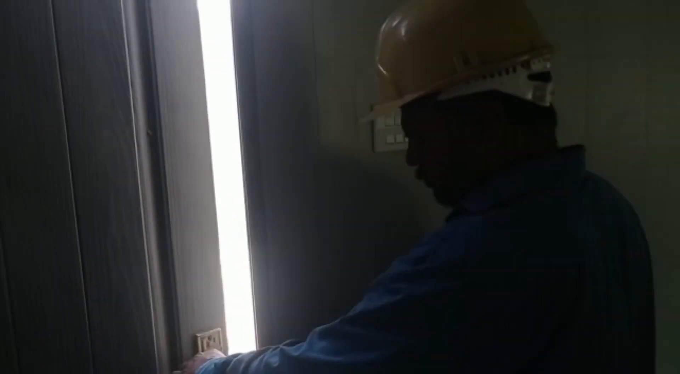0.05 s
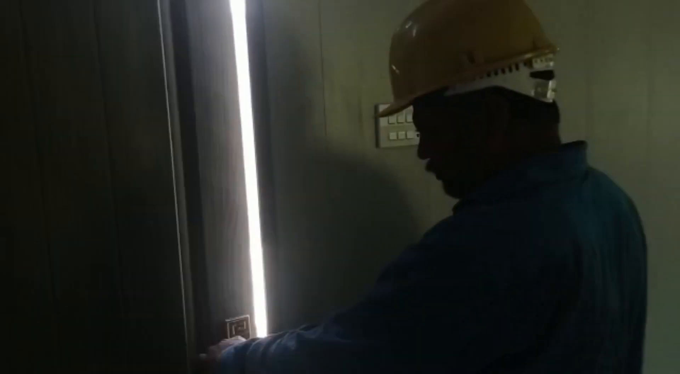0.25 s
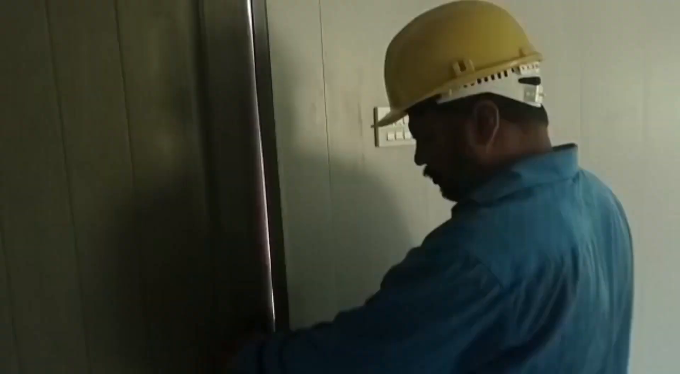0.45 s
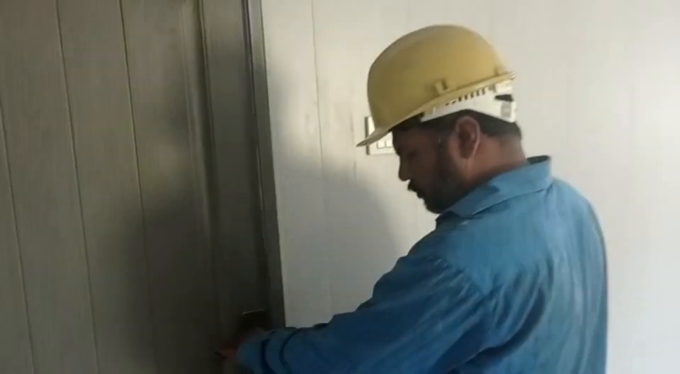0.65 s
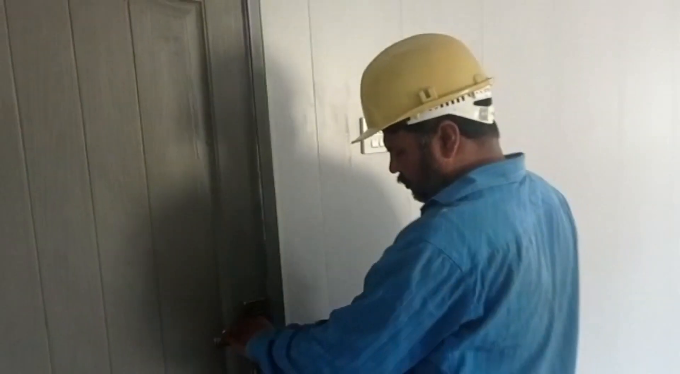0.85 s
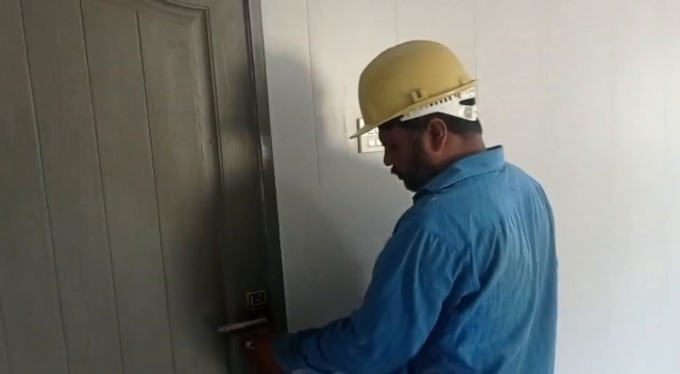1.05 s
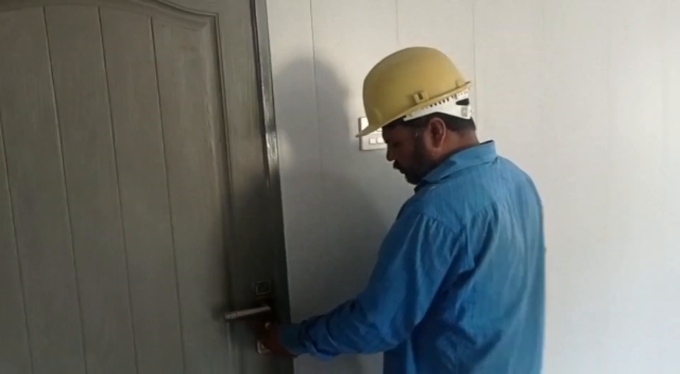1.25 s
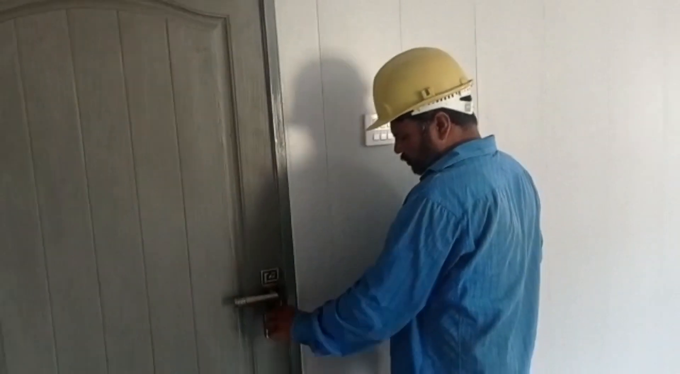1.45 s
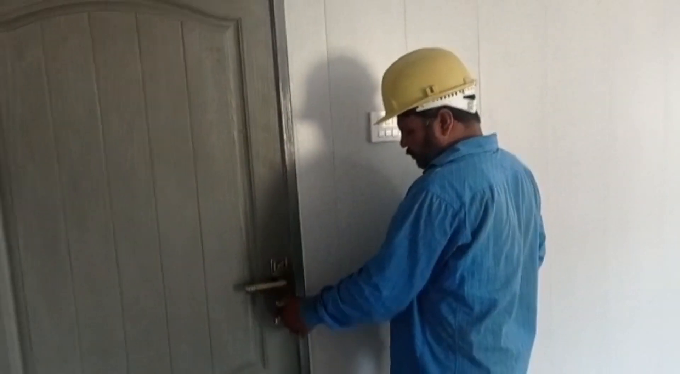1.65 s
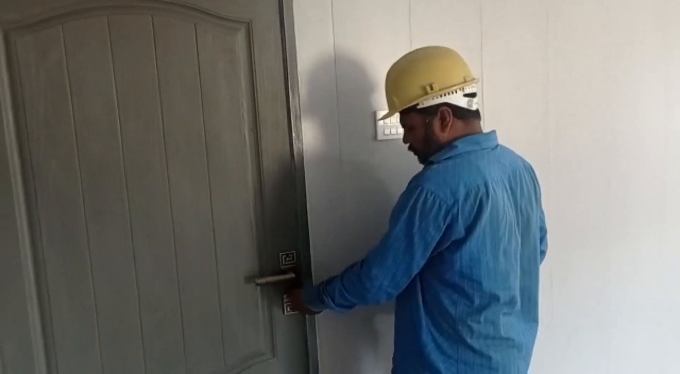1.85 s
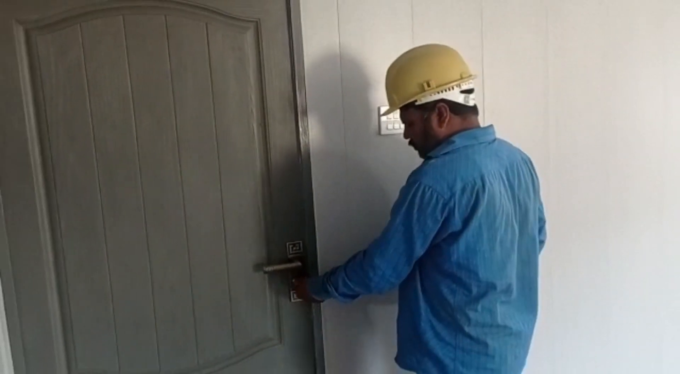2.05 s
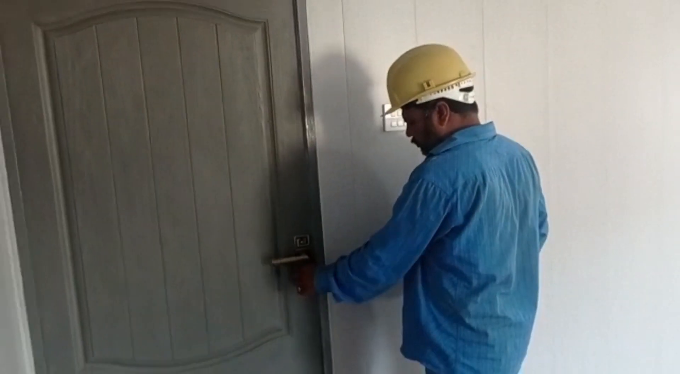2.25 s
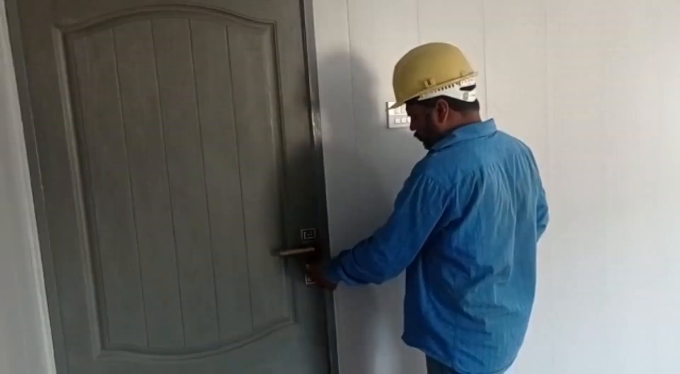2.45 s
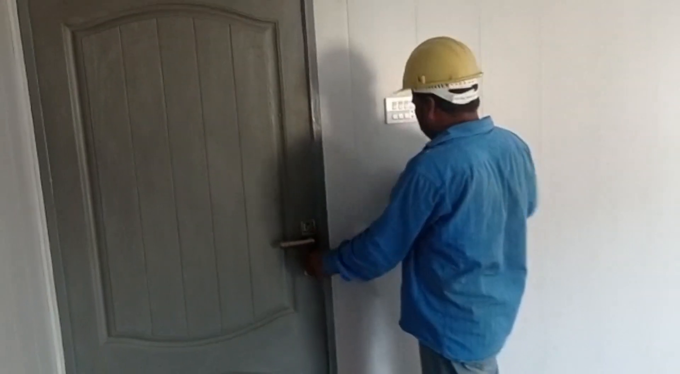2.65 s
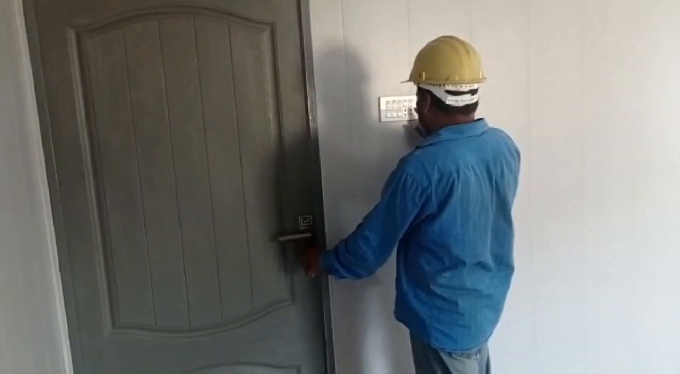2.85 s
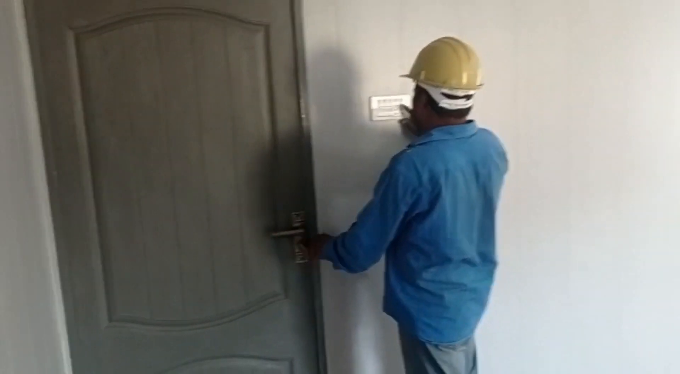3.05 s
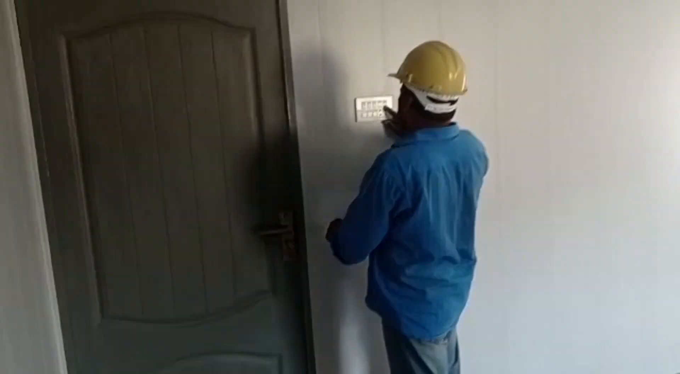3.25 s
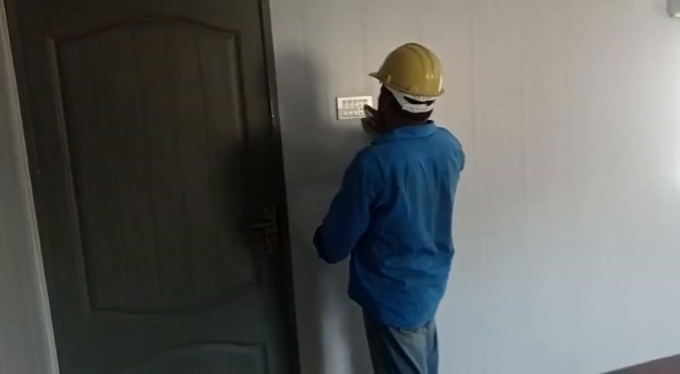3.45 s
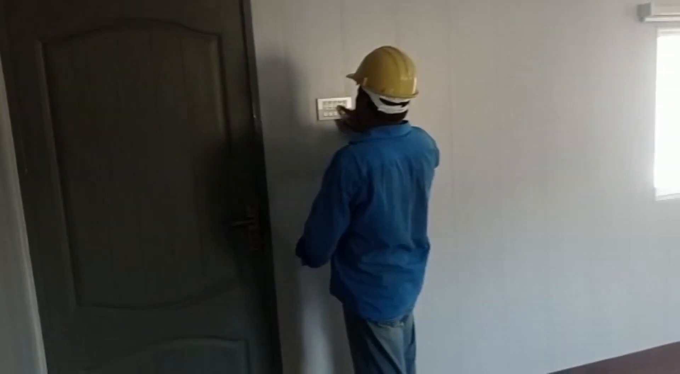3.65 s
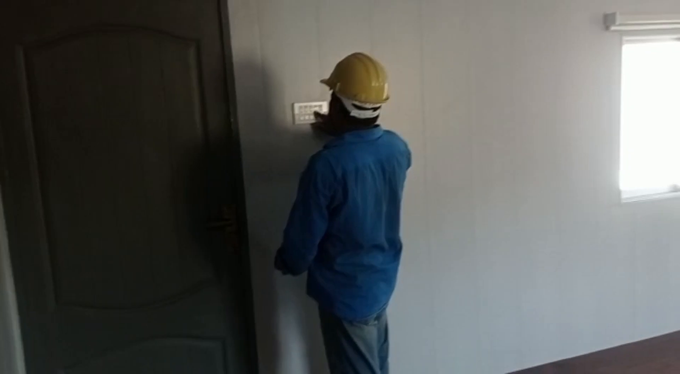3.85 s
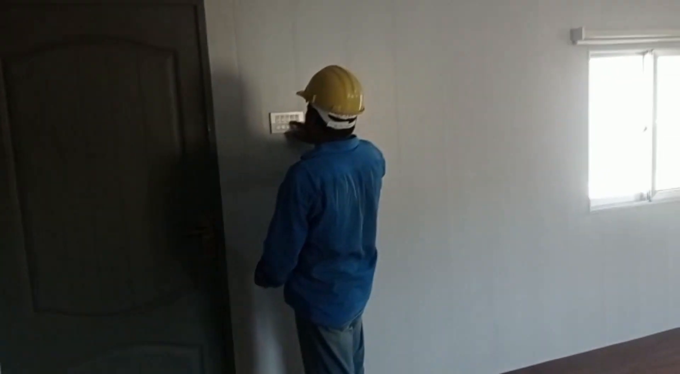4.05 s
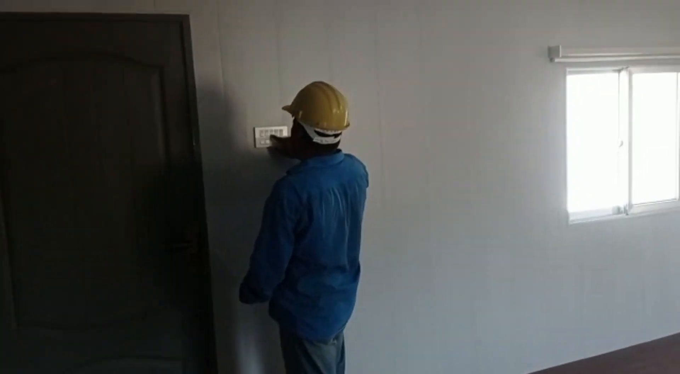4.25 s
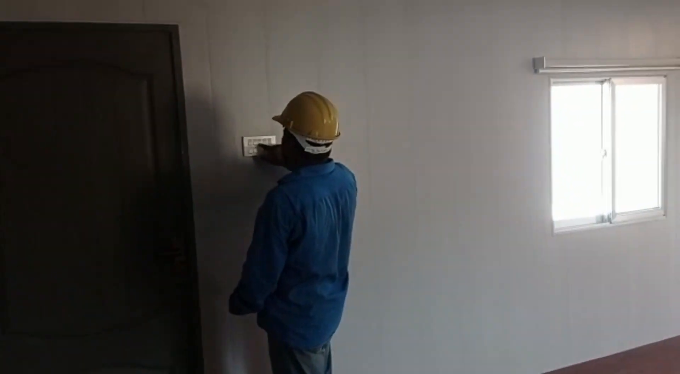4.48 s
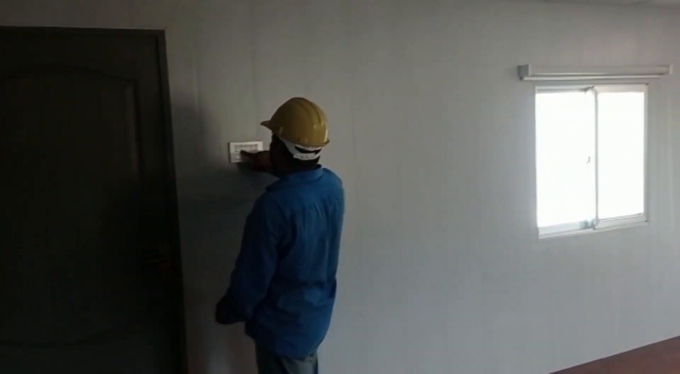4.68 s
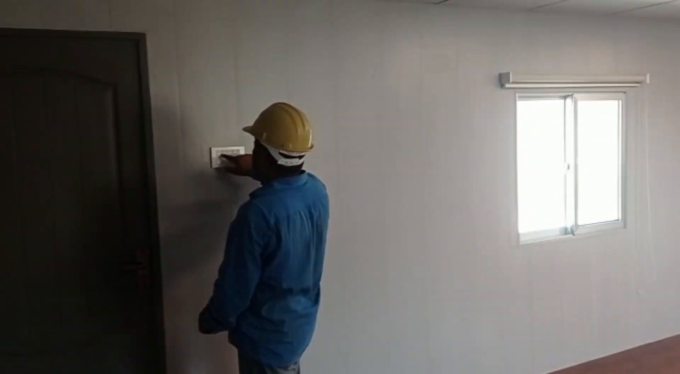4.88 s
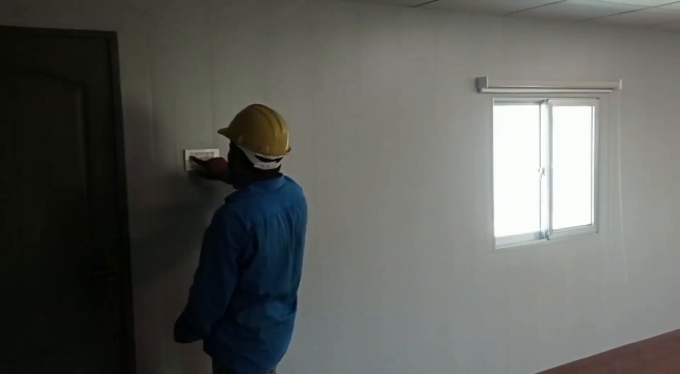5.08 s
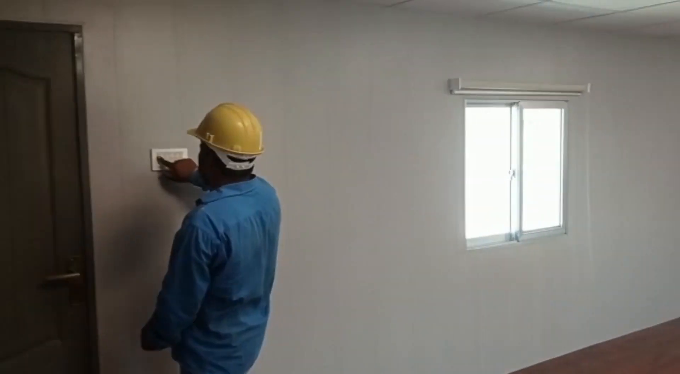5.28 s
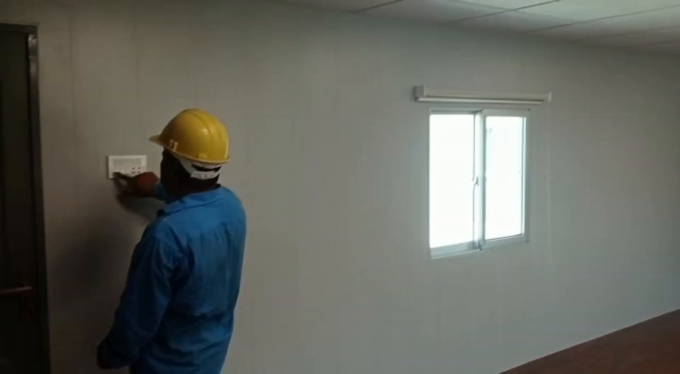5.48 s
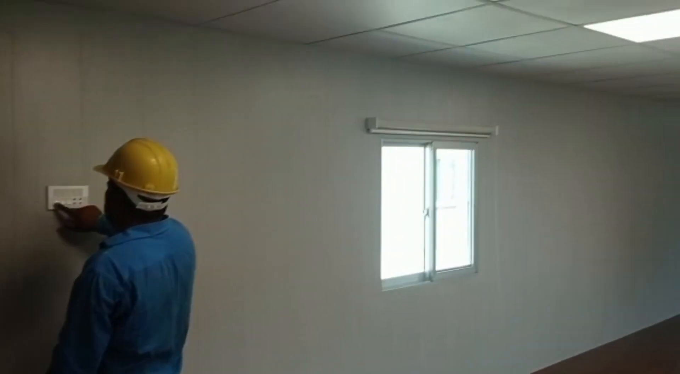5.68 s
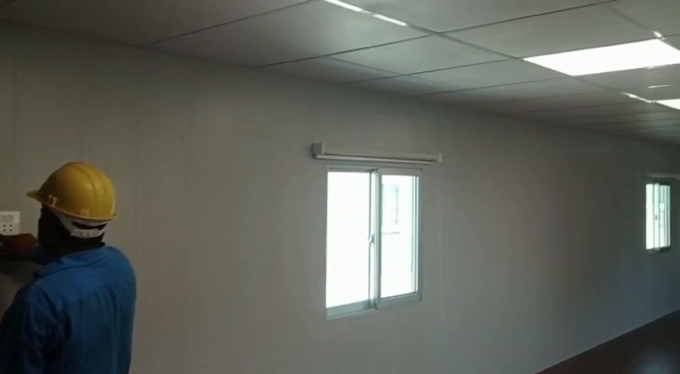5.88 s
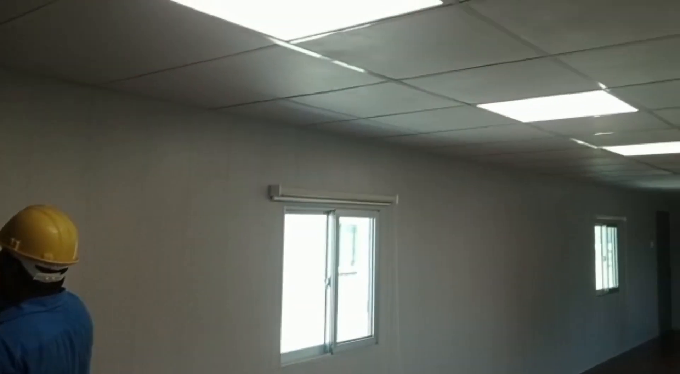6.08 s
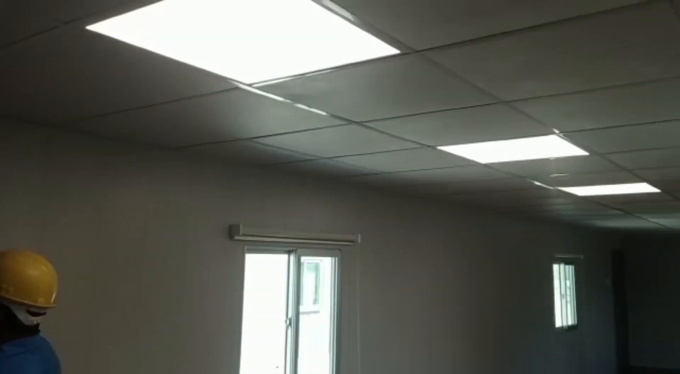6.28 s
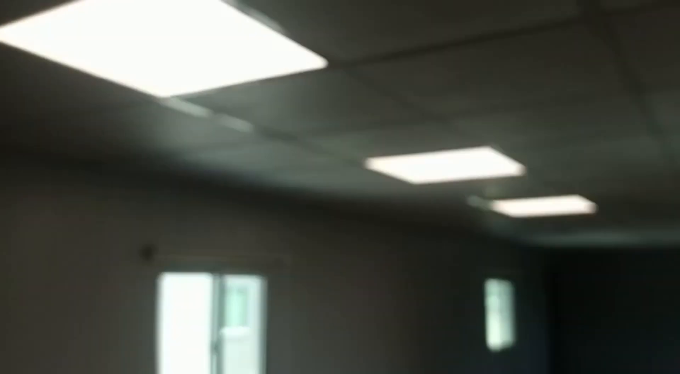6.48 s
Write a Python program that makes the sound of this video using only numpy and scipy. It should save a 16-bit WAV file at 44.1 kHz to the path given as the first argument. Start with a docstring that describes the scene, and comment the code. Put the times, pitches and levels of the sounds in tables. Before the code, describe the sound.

In a bare, echoing room, a door shuts, metal lock parts clack, and light switches are flicked on one after another.

```python
"""Door, lock and light switches

In a long bare room a door is pushed shut, its lock is worked, and five wall switches snap one by one.
Each contact is a sharp crack plus a knock from the panel behind it, and both echo in the room.
Shoes scuff the floor and a low rumble comes from outside, all through a phone's noise suppressor."""
import sys
import numpy as np
from scipy import signal
from scipy.fft import rfft, irfft
from scipy.io import wavfile
from scipy.ndimage import uniform_filter1d, map_coordinates

SR = 44100
rng = np.random.default_rng(int(sys.argv[2]) if len(sys.argv) > 2 else 0)


def transcribe(u):
    """Save the signal u as a 16-bit wav file named by the first command-line argument.

    u: samples, shape (n,) or (channels, n), limited to [-1, 1]; the rate is SR.
    q: integer samples, one column per channel.
    """
    v = np.clip(np.atleast_2d(u).T, -1, 1)
    q = np.round(v * 32767).astype(np.int16)
    wavfile.write(sys.argv[1], SR, q)


N = 287532
LEAD = SR // 2  # samples before the start, so the room is already sounding

# the tone of a steel crack: pitch_hz, level_db
STEEL_CRACK = [(150, -49), (300, -27.5), (700, -0.5), (2000, -3.5), (4000, -5), (8000, -8.5), (12000, -5.5),
               (16000, -3)]
# the pitches where steel rings brightly: pitch_hz, boost_db
STEEL_ZONES = [(2280, 6), (3350, 7.5), (6100, 4.5), (7100, 4.5), (8500, 4.5), (10000, 12.5), (11100, 11),
               (12400, 10.5)]
# the notes of the door panel around the lock: pitch_hz, level_db, fade_s (time to fall 60 dB)
LOCK_PANEL = [(297.3, -1.5, 0.054), (394, -5.5, 0.059), (495, 2.5, 0.044), (551, 5, 0.037),
              (643, 5.5, 0.022), (789, 0.5, 0.035), (1048, -11, 0.036), (1390, -16.5, 0.039),
              (1516, -16, 0.047)]


def amp(db):
    """Turn decibels into a gain."""
    return 10 ** (np.asarray(db) / 20)


def unit(x):
    """Scale a signal to an average (rms) level of 1."""
    return x / np.sqrt(np.mean(x ** 2) + 1e-20)


def along(points, hz):
    """Read a curve of (pitch_hz, value) points, on a log pitch axis."""
    pitches, values = np.transpose(points)
    return np.interp(np.log(hz + 1), np.log(pitches + 1), values)


def coloured(count, db_of):
    """Noise of level 1, with db_of(hz) setting how strong each pitch is."""
    hz = np.fft.rfftfreq(count, 1 / SR)
    return unit(irfft(rfft(rng.standard_normal(count)) * amp(db_of(hz)), count))


def octaves(hz, centre_hz):
    """Roughly how many octaves hz lies above a centre."""
    return np.log2((hz + 20) / centre_hz)


def bump(hz, centre_hz, width_hz):
    """A bell curve around one pitch, wider towards the treble."""
    return np.exp(-((hz - centre_hz) / width_hz) ** 2 * 4000 / centre_hz)


def add(out, start_s, sound):
    """Mix a sound in at its start time."""
    part = out[LEAD + round(start_s * SR):][:len(sound)]
    part += sound[:len(part)]


def rumble(steady_db=-68.5, lumps_db=3, lumps_hz=22):
    """Low outdoor noise in uneven lumps, swelling now and then."""
    # the tone of the rumble: pitch_hz, level_db
    tone = [(15, -58), (25, -19.5), (63, -2), (81, 0.5), (150, -7), (365, -38.5), (458, -38.5),
            (500, -37.5), (650, -55.5), (1100, -120)]
    # bell-shaped swells: middle_s, half_width_s, level_db
    swells = [(.36, 0.065, -51), (2.25, .04, -56), (2.8, 0.068, -65), (3.25, 0.078, -61.5),
              (3.75, .14, -63), (4.1, .1, -66), (4.45, .08, -53), (4.87, 0.073, -53), (5.57, 0.23, -61.5),
              (5.98, 0.069, -55.5), (6.16, 0.058, -61), (6.44, 0.12, -64)]
    t = np.arange(N) / SR
    level = amp(steady_db) + sum(amp(db) * np.exp(-((t - s) / half) ** 2) for s, half, db in swells)
    lumps = map_coordinates(rng.standard_normal(int(N * lumps_hz / SR) + 4), [t * lumps_hz])
    return level * unit(amp(lumps_db * lumps) * coloured(N, lambda hz: along(tone, hz)))


def room(echo_db, colour=lambda hz: 0 * hz, near_db=8, near_fade_s=0.096, build_s=0.047):
    """The room's echo: the near end dies fast while the long room fills up slowly."""
    # how long the far echo takes to fall 60 dB: pitch_hz, fade_s
    fades = [(80, 0.47), (250, 0.64), (550, 1.186), (1400, 1.734), (3700, 1.613), (6500, 0.96),
             (10000, 0.82), (12500, 0.6), (15000, 0.46)]
    hz, t, noise = signal.stft(rng.standard_normal(2 * SR), SR, nperseg=256)
    far = amp(-60 * t / along(fades, hz)[:, None]) * (1 - np.exp(-(t / build_s) ** 2))
    near = amp(near_db - 60 * t / near_fade_s)
    shape = unit(amp(colour(hz)))[:, None] * (far + near)
    return amp(echo_db) * signal.istft(noise * shape, SR, nperseg=256)[1]


def first_echoes():
    """The direct sound, then its first bounces off the walls."""
    # wall bounces: delay_s, level_db
    bounces = [(.0035, -10), (.0065, -9.5), (0.0121, -9), (0.0194, -2.5), (0.029, -9.5)]
    response = np.zeros(SR // 20)
    response[0] = 1
    for delay_s, db in bounces:
        response[round(delay_s * SR * rng.uniform(.93, 1.07))] += amp(db)
    return response


def contacts(out, events, crack, zones, panel, rise_s=.002, width_hz=250, spot_db=6.5,
             knock_gain_db=0, echo_db=-34.5, direct_db=-10, room_db=-4.5):
    """Each contact is a short crack with bright zones, and it knocks the panel behind it."""
    t = np.arange(SR // 4) / SR
    burst = t / rise_s * np.exp(1 - t / rise_s)
    # Event columns: start_s, level_db, knock_db, knock_tilt_db_per_octave, crack_tilt_db_per_octave,
    # ringing (0 to 1), spot_hz (an extra bright pitch). A higher tilt sounds brighter.
    for start_s, db, knock_db, knock_tilt, crack_tilt, ringing, spot_hz in events:
        ripple_db = rng.normal(0, 2, 100)  # no two contacts ring quite alike
        colour = lambda hz: (along(crack, hz) + crack_tilt * octaves(np.maximum(hz, 700), 3000)
                             + np.interp(hz, np.linspace(0, SR / 2, len(ripple_db)), ripple_db)
                             + spot_db * bump(hz, spot_hz, 2 * width_hz)
                             + ringing * sum(boost * bump(hz, at, width_hz) for at, boost in zones))
        # the direct crack is a little duller than its echo
        snap = coloured(len(t), lambda hz: colour(hz) - 0.5 * octaves(hz, 3000)) * burst
        scatter_db = rng.normal(0, 1.5, len(panel))
        ring = 0
        for k, (hz, note_db, fade_s) in enumerate(panel):
            fade = amp(note_db + scatter_db[k] + knock_tilt * octaves(hz, 300) - 60 * t / fade_s)
            ring += (-1) ** k * fade * np.sin(2 * np.pi * hz * rng.normal(1, 0.011) * t)
        knock = amp(knock_db + knock_gain_db) * ring * (1 - np.exp(-t / (.9 * rise_s)))
        add(out, start_s, amp(db + direct_db) * signal.fftconvolve(snap + knock, first_echoes()))
        add(out, start_s, amp(db + room_db) * signal.fftconvolve(knock, room(echo_db)))
        # the room gathers the crack from all directions, so it keeps only its overall tone
        add(out, start_s + rise_s, amp(db + room_db) * np.linalg.norm(burst) * room(echo_db, colour))


def tick(out, fade_s=.004):
    """One buzzy little tick close by, too faint to make the room echo."""
    # the tick: start_s, level_db, pitch_hz
    event = (6.281, -45, 2510)
    start_s, db, hz = event
    t = np.arange(200) / SR
    buzz = sum(np.sin(2 * np.pi * hz * k * t) / k for k in (1, 2, 3, 4, 6))
    add(out, start_s, amp(db - 60 * t / fade_s) * buzz)


def scuffs(out, echo_db=-30, grit_db=3):
    """Soles slide on the floor: gritty noise that starts quickly and eases off."""
    # each slide: start_s, length_s, level_db, tilt_db_per_octave
    slides = [(-.05, 0.14, -48.5, -3), (0.073, 0.2, -52, -5), (0.92, 0.043, -53.5, 15),
              (1.208, 0.054, -61.5, 14.5), (1.457, 0.14, -54.5, -4.5), (1.722, 0.11, -59.5, -5.5),
              (1.82, 0.052, -65.5, -6.5), (2.768, .05, -61, -8), (5.926, 0.099, -61.5, -1.5),
              (6.37, 0.06, -60.5, -1.5)]
    # the tone of a sliding sole: pitch_hz, level_db
    sole = [(500, -34), (1000, -16), (2500, -16), (4600, -8), (5500, 0.5), (7000, -0.5), (9000, -3),
            (12000, -1), (16000, -1)]
    for start_s, length_s, db, tilt in slides:
        count = round(length_s * SR)
        progress = np.arange(count) / count
        grit = amp(grit_db * unit(uniform_filter1d(rng.standard_normal(SR // 4), 90))[:count])
        rub = coloured(SR // 4, lambda hz: along(sole, hz) + tilt * octaves(hz, 6000))[:count]
        slide = amp(db) * rub * grit * np.sin(np.pi * progress ** 0.63)
        add(out, start_s, slide)
        add(out, start_s, signal.fftconvolve(slide, room(echo_db)))


def footstep(out):
    """One soft footfall, a faint contact that borrows the tone of the lock."""
    # the foot landing: event columns as in contacts()
    landing = [(6.478, -61, 6.4, 0.0026, -2, 0.097, 2060)]
    contacts(out, landing, STEEL_CRACK, STEEL_ZONES, LOCK_PANEL)


def door(out):
    """The door meets its frame and latch: steel cracks and the whole panel thuds."""
    # hits on frame and latch: event columns as in contacts()
    hits = [(-.25, -25.5, -24.5, -7, -2, 0.4, 4814), (0.286, -45.5, 0, 4, -2, .4, 6310),
            (0.358, -66, 26, -8.5, -3.5, 0.6, 2890), (0.5212, -20, 4, -6, -7, .1, 6465),
            (0.5484, -28.5, 5.5, -4, -1.5, .2, 4000), (.573, -34.5, 15.5, -9, -2, .1, 2504),
            (0.615, -34, 16.5, -4.5, -2, .1, 2000), (0.6402, -14, 9, -1.5, -0.5, .1, 1104),
            (0.648, -13.5, -1, 2, -1.5, 0.1, 6700), (0.671, -29, 7.5, 0, -6, 0.5, 3858)]
    # the notes of the door panel: pitch_hz, level_db, fade_s
    panel = [(75, 3.5, 0.068), (96, 1, .09), (148.5, 4, 0.068), (182, -5, 0.05), (256, -2, 0.065),
             (327.2, -5.5, .1), (393, -6.5, 0.088), (456, -2.5, 0.05), (514, -5, 0.14), (580, -3, 0.067),
             (646.8, -14.5, 0.19), (727, -16.5, 0.069), (787, -16.5, 0.086), (990, -19, 0.07),
             (1093, -23.5, 0.055), (1300, -34, .04)]
    contacts(out, hits, STEEL_CRACK, STEEL_ZONES, panel,
             rise_s=.0022, width_hz=550, knock_gain_db=-2, echo_db=-35.5)


def lock(out):
    """Steel parts click and knock the panel around the lock."""
    # clicks of key, bolt and handle: event columns as in contacts()
    clicks = [(1.2334, -43.5, -9.5, 6, -2.5, 0.21, 2200), (1.288, -28, -3.5, -9.5, -3, 0.38, 11300),
              (1.3958, -27.5, 2, -5, -3, 0.1, 3200), (1.5042, -34.5, -13.5, -3.5, 4.5, 0.28, 6540),
              (1.7, -53.5, 6, 6, -2.5, 0.37, 2770), (1.915, -33, 0, 1, -5, 0.2, 2300),
              (2.178, -41.5, -11.5, -9.5, -2, 0.43, 11100), (2.197, -34.5, -2.5, -1, -3, .4, 2100),
              (2.2126, -10.5, -13, 4.5, 0.5, 0.58, 6040), (2.2839, -26.5, 1, -15, 0.5, .4, 3280),
              (2.5687, -36.5, 7.5, -1.5, -3, .6, 12500), (2.6148, -53, 12, -1, -2, 0.6, 12400),
              (2.649, -36.5, -1, 0.5, -6, 0.35, 2280), (2.82, -48.5, 11.5, -4.5, -1, .3, 6300)]
    contacts(out, clicks, STEEL_CRACK, STEEL_ZONES, LOCK_PANEL)


def switches(out):
    """Plastic switches snap over and lightly knock the wall board."""
    # touches and snaps: event columns as in contacts()
    snaps = [(3.41, -46.5, -23.5, 0, 4, .3, 6780), (3.4237, -17, -23, 0.046, -0.46, 0.13, 4240),
             (4.0606, -29, -53, 0, -1.1, 1, 1870), (4.072, -35, -22, 0.062, -3.5, 1, 3157),
             (4.4019, -14.5, -28, 0.99, -1.4, 0.25, 2750), (4.793, -18.5, -25, 0.084, -2.5, 0.16, 2230),
             (5.2751, -14.5, -21, 0.65, -1.64, 0.22, 4020)]
    # the tone of a plastic crack: pitch_hz, level_db
    crack = [(150, -54.5), (300, -12), (1000, -11), (1400, -7), (2500, -5.5), (4200, -2), (7000, -1),
             (9500, 1), (12000, -6.5), (15000, 2.5)]
    # the pitches where plastic rings or is dulled: pitch_hz, boost_db
    zones = [(1400, -10), (1900, 4), (2350, -1), (2850, 18.5), (3200, 12.5), (3750, 3.5), (4300, 1.5),
             (5300, 9.5), (6600, 13), (8200, 0.5), (9600, -5), (11000, -1.5)]
    # the notes of the wall board: pitch_hz, level_db, fade_s
    board = [(278, -11.5, 0.037), (353, 7, 0.026), (427, 2.5, 0.052), (535, 4.5, 0.027), (673, 12, 0.012),
             (773, 8, 0.014), (1316, 4, 0.041)]
    contacts(out, snaps, crack, zones, board,
             rise_s=0.00087, width_hz=110, spot_db=4.5, knock_gain_db=-5.5, echo_db=-30.5)


def scene():
    """Mix the sounds in the room over the outdoor rumble, in one channel."""
    out = np.zeros(N + LEAD)
    door(out)
    lock(out)
    footstep(out)
    switches(out)
    scuffs(out)
    tick(out)
    return (out[LEAD:] + rumble())[None]


def record(dry, deepest_cut_db=-12, hiss_db=-80.5, top_hz=15800):
    """The phone colours the sound, turns down its quiet parts, adds hiss and cuts the top treble."""
    # the tone of the microphone: pitch_hz, gain_db
    microphone = [(40, -20), (90, 1), (4500, 0), (5200, -2), (6400, 1), (8000, -6.5), (10000, -15),
                  (12000, -19), (13900, -20), (14600, -14.5), (15500, -15), (15900, -18.5)]
    # the noise suppressor turns down whatever sinks to this level: pitch_hz, level_db
    threshold = [(50, -100), (200, -89), (400, -78.5), (1100, -79.5), (1400, -84.5), (3000, -85.5),
                 (5000, -89.5), (7000, -94.5), (10000, -103), (16000, -108)]
    # the tone of the faint hiss: pitch_hz, level_db
    hiss_tone = [(200, -13.5), (400, -3), (1200, -11.5), (3000, -11.5), (6000, -19), (8500, -26),
                 (12000, -27.5), (16000, -27)]
    hz, _, spectrum = signal.stft(dry[0], SR, nperseg=1024, noverlap=768)
    spectrum = spectrum * amp(along(microphone, hz))[:, None]
    power = uniform_filter1d(np.abs(spectrum) ** 2, size=11, axis=0)  # smooth across pitch
    power = np.abs(uniform_filter1d(power, size=4, axis=1))  # then across time
    above = (power / amp(2 * along(threshold, hz))[:, None]) ** 2
    gain = np.maximum(above / (above + 1), amp(deepest_cut_db))
    sound = signal.istft(spectrum * gain, SR, nperseg=1024, noverlap=768)[1][:N]
    hiss = amp(hiss_db) * coloured(N, lambda f: along(hiss_tone, f))
    treble_cut_db = np.clip((np.fft.rfftfreq(N, 1 / SR) - top_hz) / 12, 0, 90)
    return irfft(rfft(sound + hiss) * amp(-treble_cut_db), N)[None]


dry = scene()
out = record(dry)
transcribe(out)
```